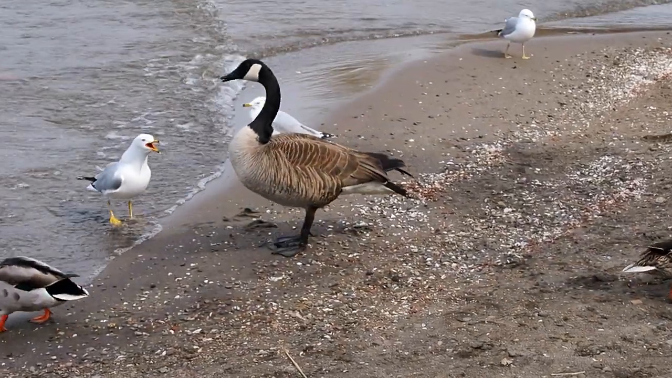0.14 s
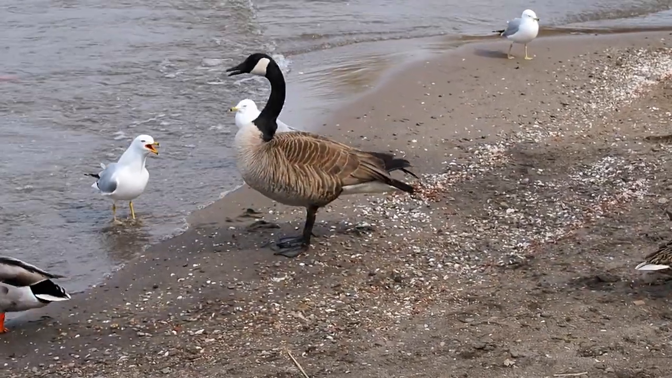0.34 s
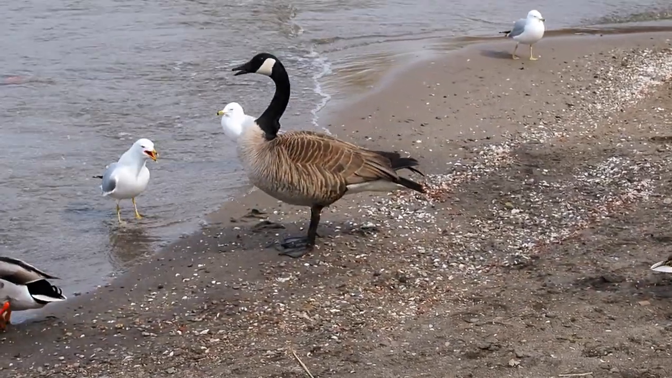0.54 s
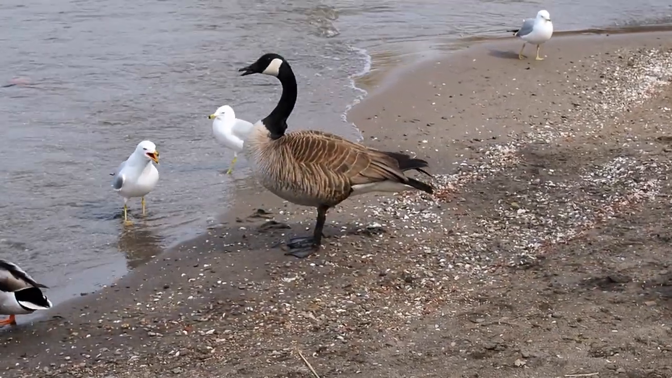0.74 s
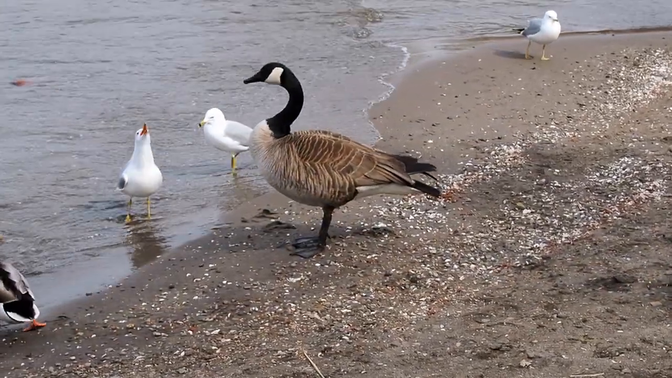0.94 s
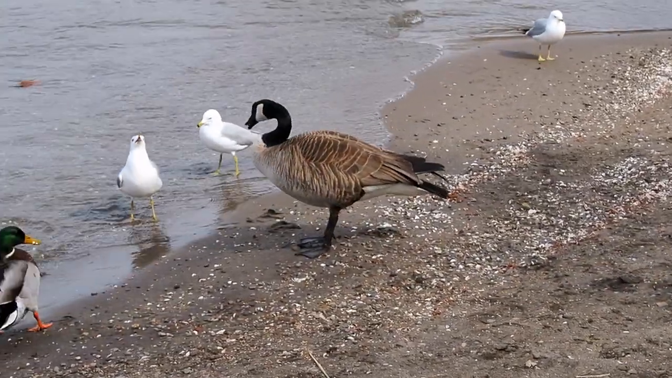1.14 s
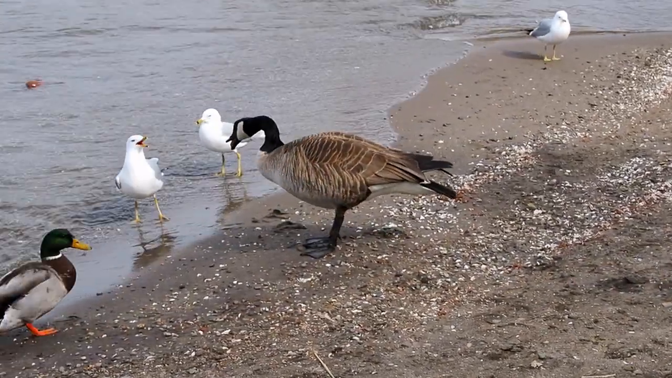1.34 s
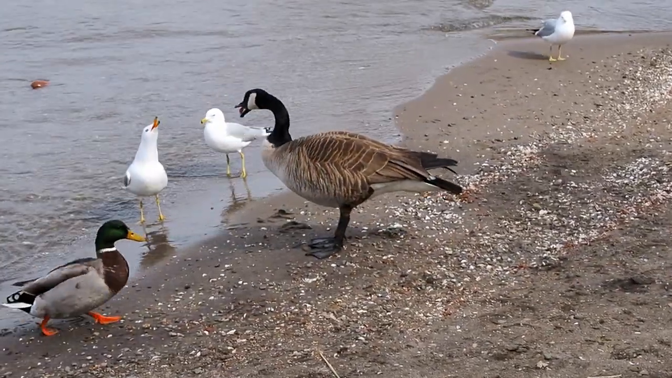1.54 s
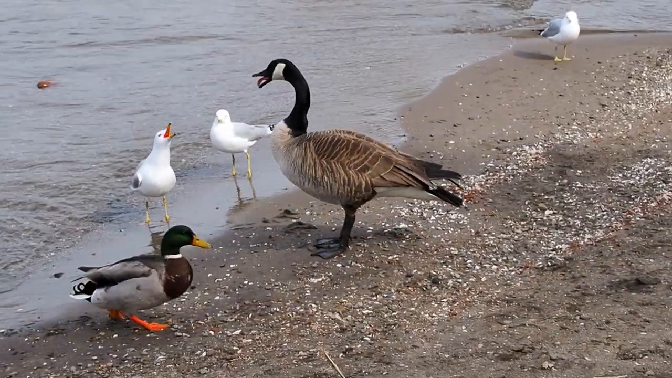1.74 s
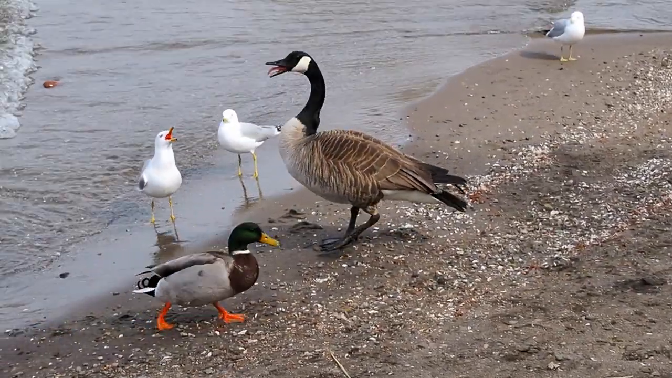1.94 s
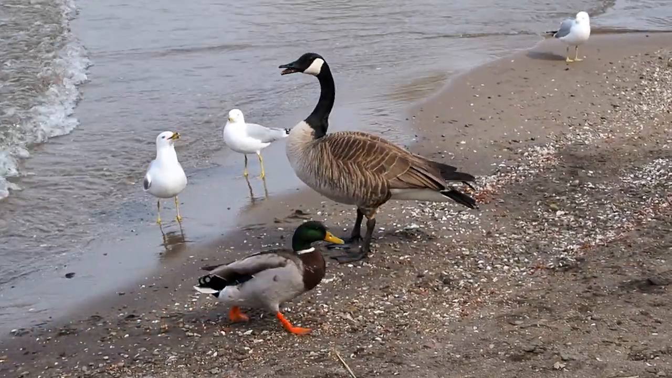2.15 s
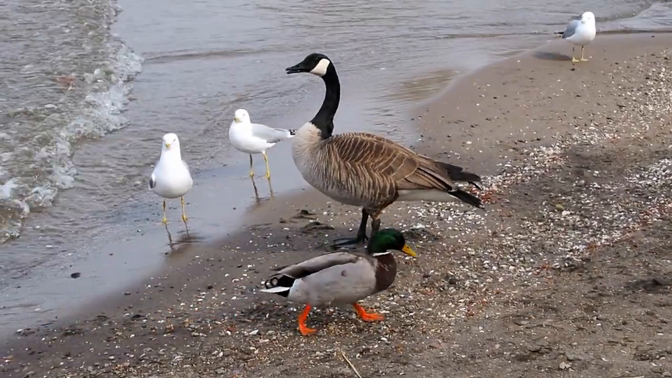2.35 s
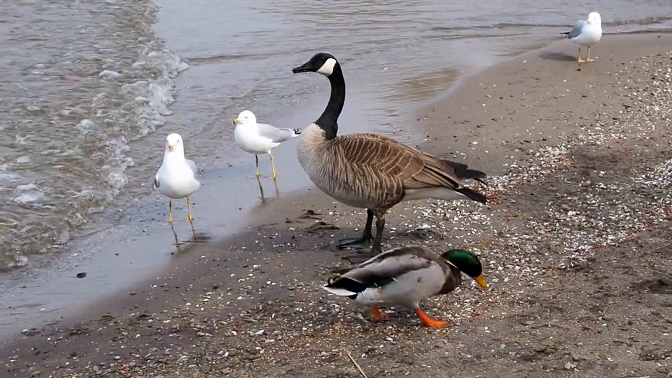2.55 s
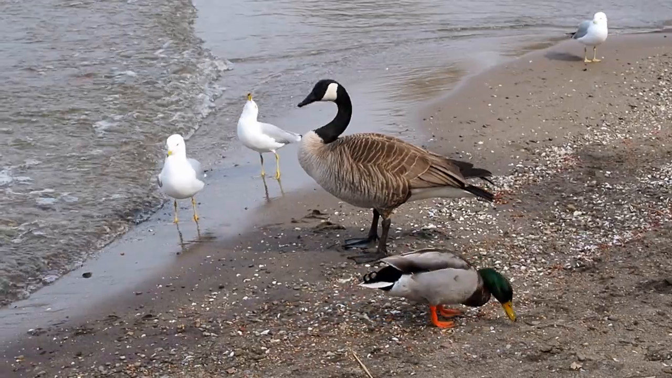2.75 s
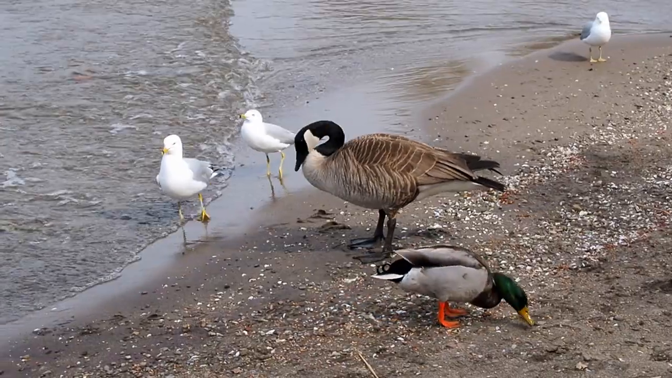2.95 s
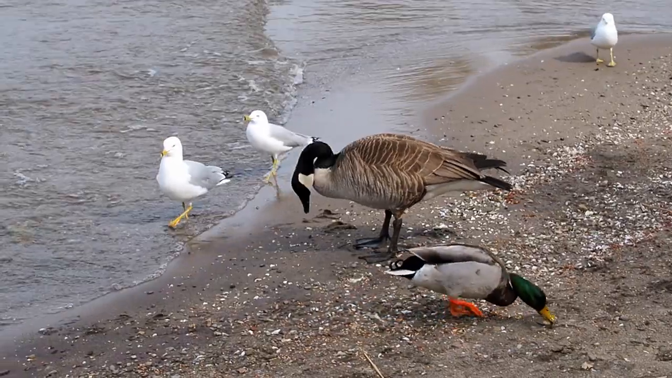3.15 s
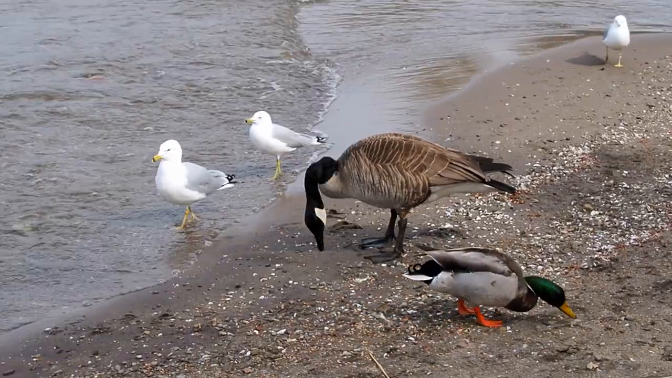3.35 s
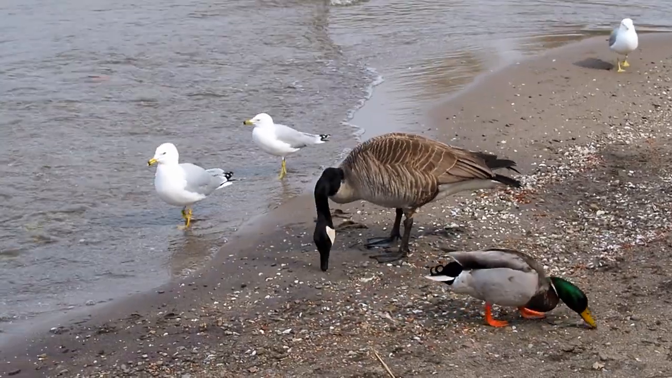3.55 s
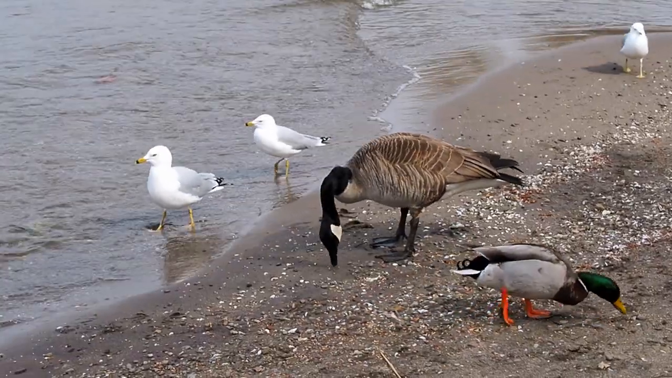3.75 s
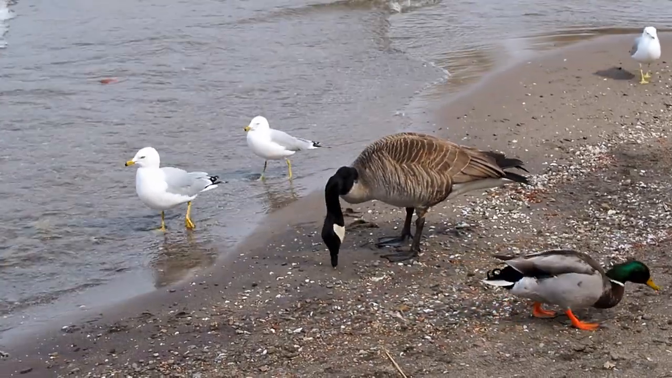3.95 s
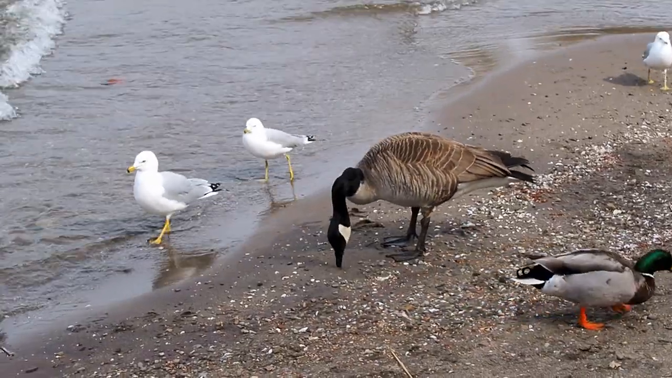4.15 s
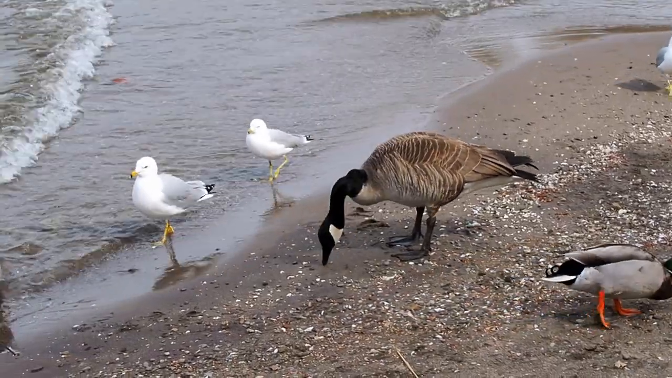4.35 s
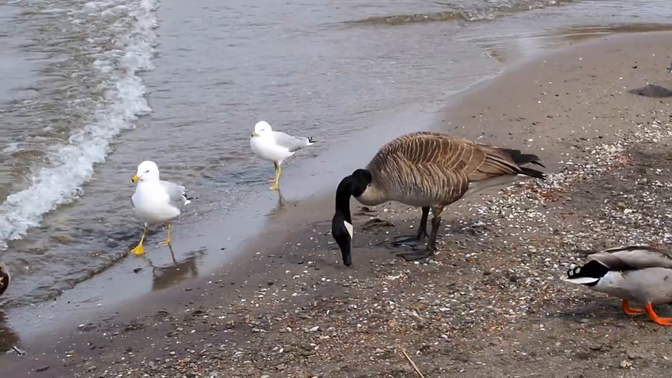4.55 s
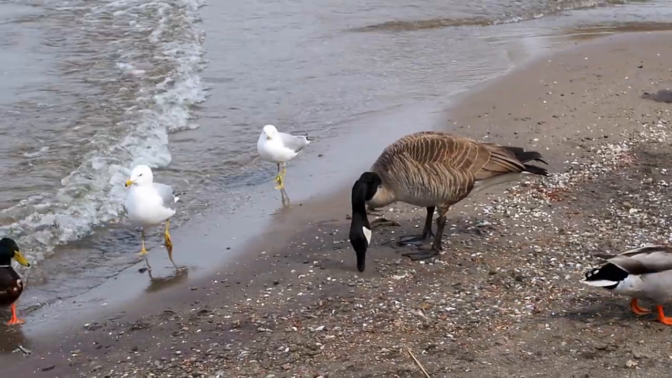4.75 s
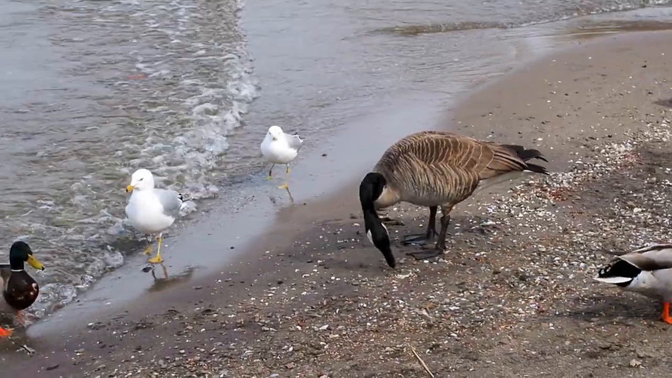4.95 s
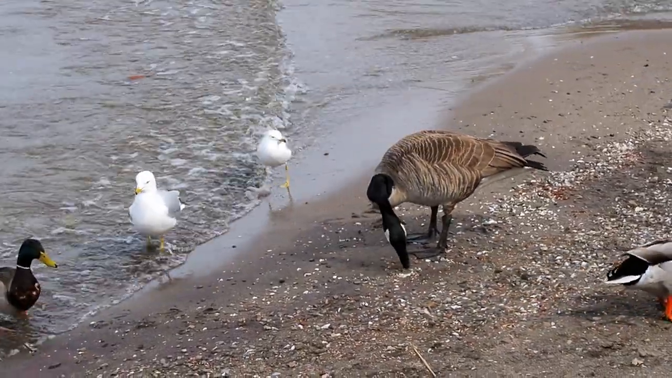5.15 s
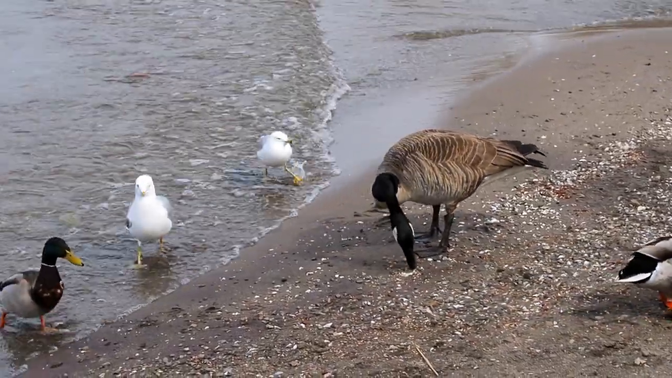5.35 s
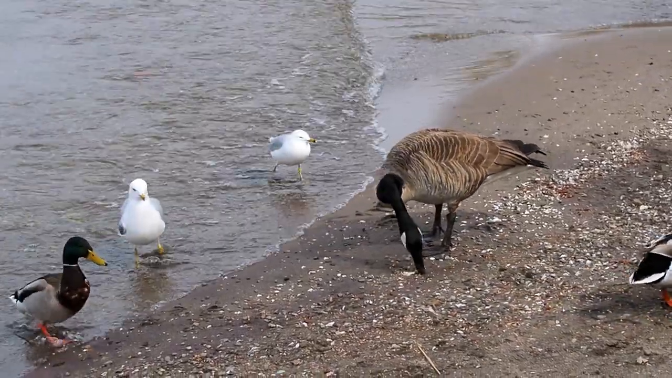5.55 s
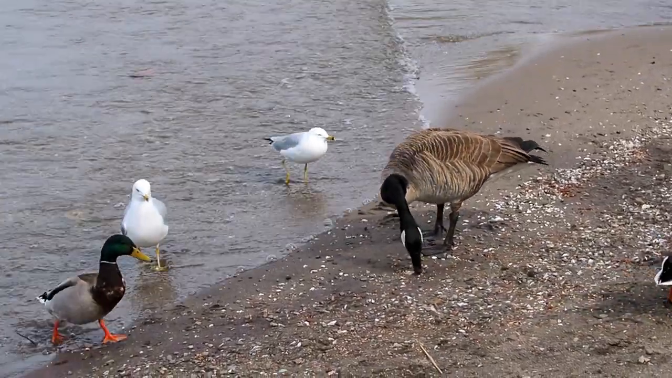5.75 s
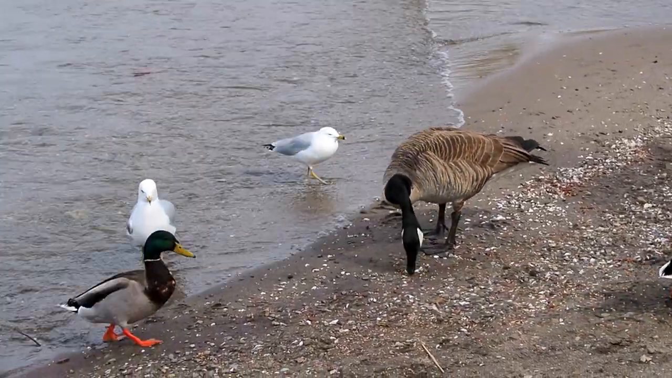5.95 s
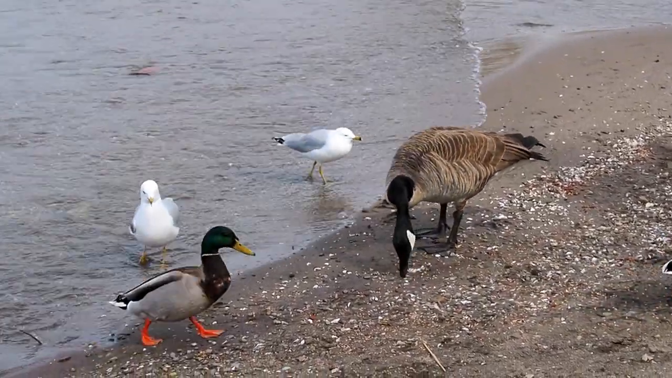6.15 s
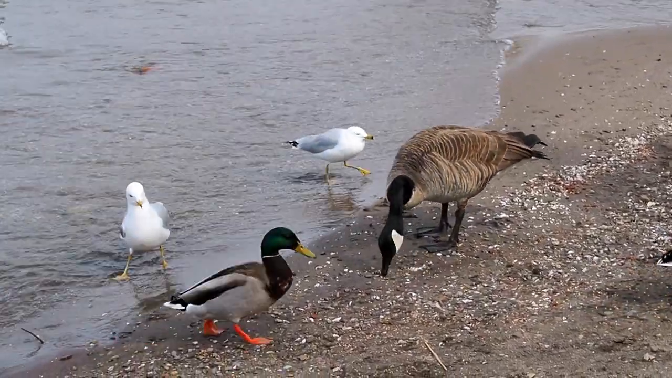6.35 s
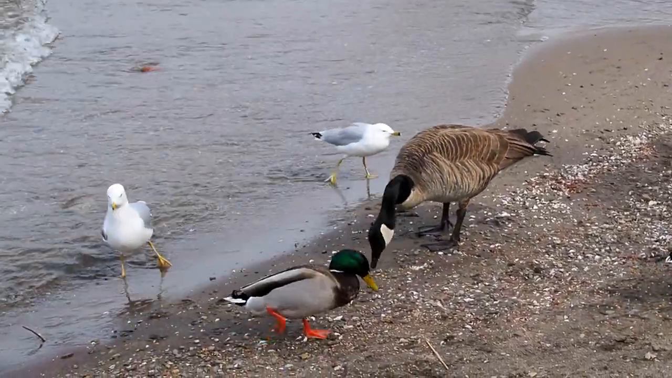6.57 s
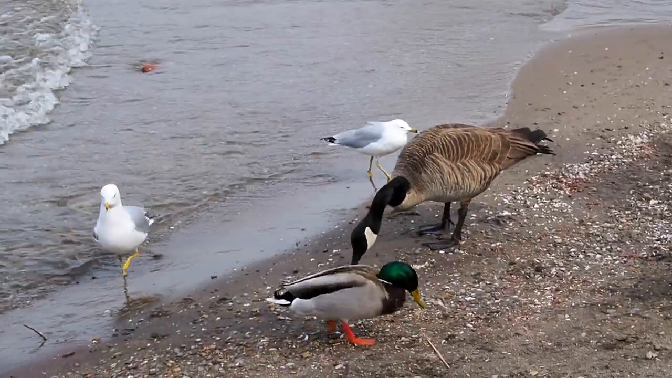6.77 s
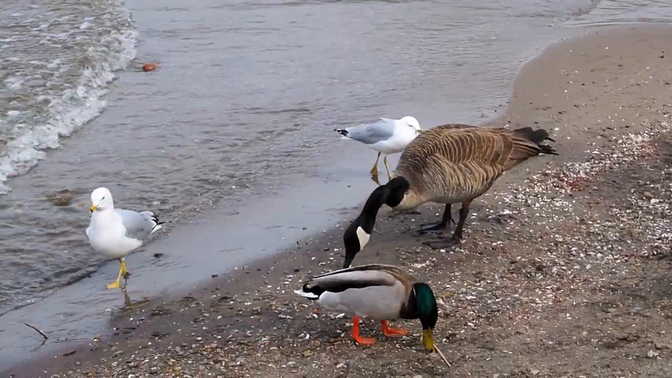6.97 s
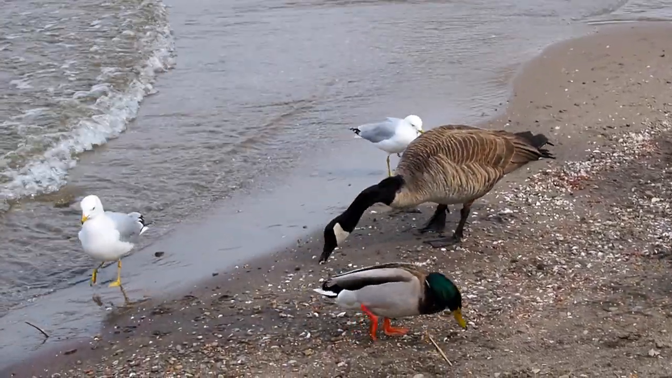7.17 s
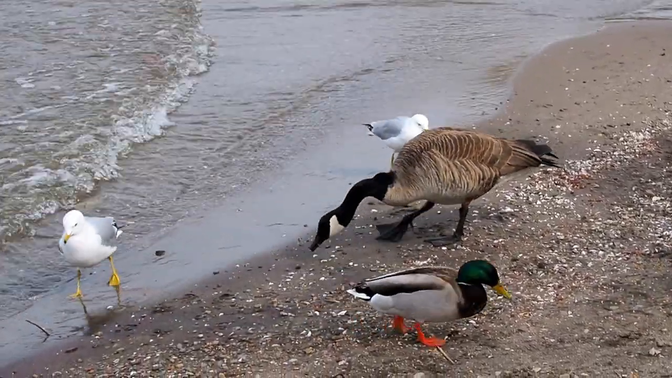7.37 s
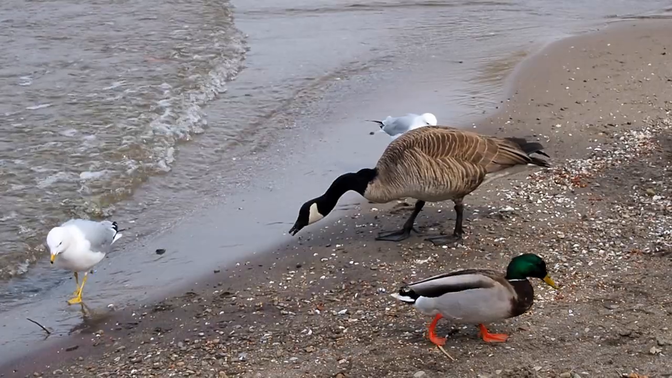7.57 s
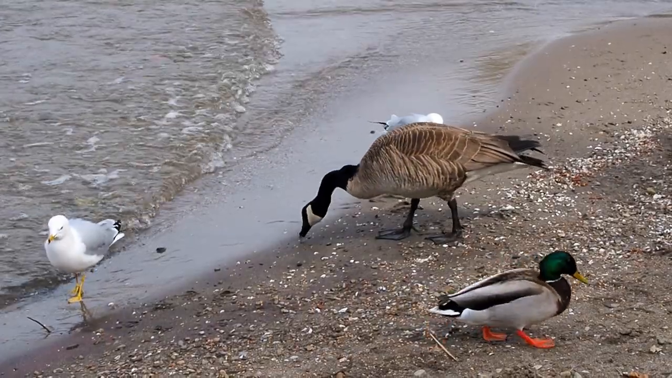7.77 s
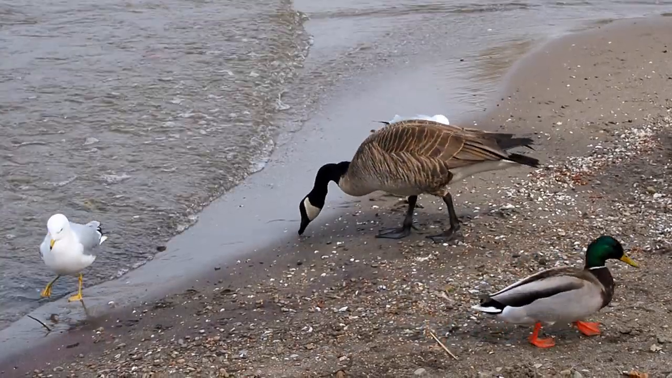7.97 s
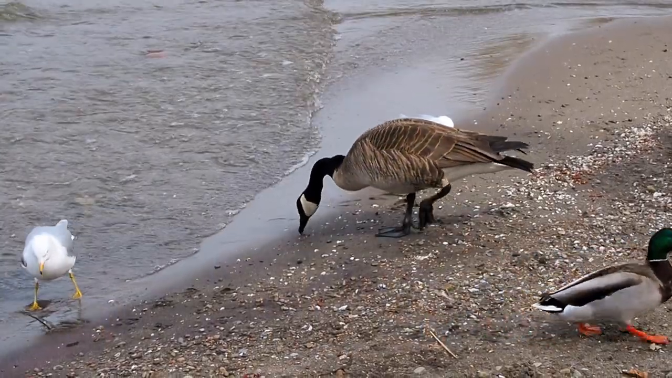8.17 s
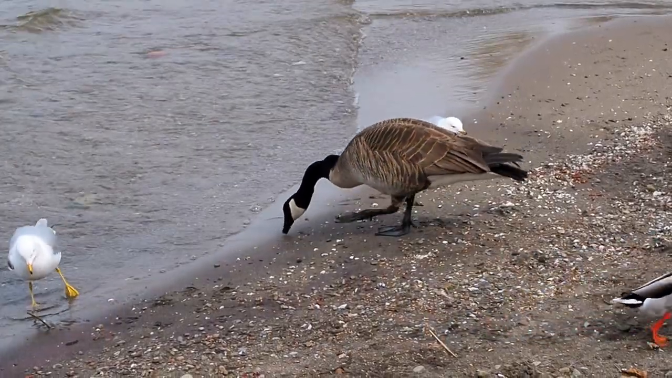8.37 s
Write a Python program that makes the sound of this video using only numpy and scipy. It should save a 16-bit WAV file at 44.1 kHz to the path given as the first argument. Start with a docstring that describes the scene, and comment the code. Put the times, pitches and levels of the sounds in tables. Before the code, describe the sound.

Close, loud gull calls open the scene, roughly two a second, nasal and cracking from low to high, followed by a thin descending squeal. Several calm seconds of light lapping follow, with bubbly wash, fine foam hiss, an occasional tiny click of shell grit and a drop plinking. Near the end two longer, somewhat softer gull cries sound slightly to the right. Open beach, dry stereo pickup, little bass.

```python
"""Gulls call on a lakeshore while small waves run up the sand and drain through shell grit.
Most calls start in a reedy low voice, made of pulses that ring the throat, break into a clear high
stack of harmonics and end in a short rasp; where the voices overlap, the low one puts sidebands on the high.
The water is coloured noise with ringing bubbles in it: slosh, wash and fizzing foam.
Shell ticks are short noise bursts, and single drops are dying sines that rise in pitch."""
import sys
import numpy as np
from scipy import signal
from scipy.fft import rfft, irfft, next_fast_len
from scipy.io import wavfile
from scipy.ndimage import uniform_filter1d, map_coordinates

SR = 44100
rng = np.random.default_rng(int(sys.argv[2]) if len(sys.argv) > 2 else 0)


def bounce(signal):
    """Save signal as a 16-bit WAV file at the path given by the first command-line argument."""
    frames = np.transpose(np.atleast_2d(signal))
    limited = np.clip(frames, -1, 1)
    pcm = np.round(limited * 32767).astype(np.int16)
    wavfile.write(sys.argv[1], SR, pcm)


N = 370881  # length in samples

# Throat colours of the low voice, for different settings of beak and neck.
# Each row: frequency in Hz, gain in dB.
OPEN = [(1150, -15.5), (1750, 5), (2700, -2.5), (3500, 3), (4800, 7.5), (5500, -15)]
WIDE = [(1850, -2), (2500, -1), (3600, 6.5), (4350, -8), (5000, 4), (5650, -1)]
BOWED = [(1280, -2), (1950, 5), (2550, -0.5), (3200, -17), (3900, -8.5), (5250, -10.5)]
HOARSE = [(1400, -6.5), (1800, 1), (2450, 4.5), (3400, -5), (4400, 2), (5400, -11.5)]
SQUEAK = [(1700, -14), (2570, 3.5), (3420, -4.5), (4280, -13), (5130, -11)]
YELP = [(1200, 11.5), (1450, -5.5), (1950, -14), (3000, -5.5), (4000, 4), (5500, -6)]


def amp(db):
    """Decibels to gain."""
    return 10 ** (np.asarray(db) / 20)


def unit(x):
    """Scale to rms 1."""
    return x / np.sqrt(np.mean(x ** 2) + 1e-20)


def along(points, hz):
    """Read (Hz, value) points on a log axis."""
    f, v = np.transpose(points)
    return np.interp(np.log(hz + 1), np.log(f + 1), v)


def curves(rows, t):
    """Each column after the time, read at times t."""
    s, *cols = np.transpose(rows)
    return [np.interp(t, s, c) for c in cols]


def wobble(rate, size):
    """A smooth random curve, rate knots a second."""
    knots = rng.standard_normal(int(size * rate / SR) + 4)
    return map_coordinates(knots, [np.arange(size) * rate / SR])


def filtered(x, response):
    """x times a response of frequency."""
    m = next_fast_len(N + SR // 2)
    return irfft(rfft(x, m) * response(np.fft.rfftfreq(m, 1 / SR)), m)[..., :N]


def cycle(hz):
    """Running phase of an oscillator."""
    return 2 * np.pi * np.cumsum(hz) / SR


def times(start, end):
    """Sample times of a note."""
    return np.arange(max(int(start * SR), 0), min(int(end * SR), N)) / SR


def edges(t, fade):
    """Soft-edged gate of a note and the time to its nearer end."""
    inside = np.minimum(t - t[0], t[-1] - t)
    return np.sin(np.pi / 2 * np.clip(inside / fade, 0, 1)), inside


def bell(t, centre, before, after):
    """A smooth hump of height 1 with its own width on each side."""
    return np.exp(-((t - centre) / np.where(t < centre, before, after)) ** 2)


def throat_gain(throat, hz):
    """What the throat lets through at these frequencies."""
    # Skirts that every throat shares. Each row: frequency in Hz, gain in dB.
    low_skirt = [(600, -33.5)]
    high_skirt = [(7200, -16.5), (10000, -22), (15000, -37)]
    return amp(along(low_skirt + throat + high_skirt, hz))


def reed(t, hz, db, throat, rough):
    """Low voice: pulses ring the throat, with uneven cycles as it starts and stops."""
    gate, inside = edges(t, fade=0.0085)
    rough = rough + 0.635 * np.exp(-(inside / 0.0092) ** 2)
    phase = cycle(hz * (1 + 0.088 * rough * wobble(495.0, len(t))))
    pulses = sum(np.sin(k * phase) for k in range(1, 23))
    pulses = pulses * (1 + .7 * rough * wobble(800, len(t)))
    size = 2 * len(t)
    spectrum = rfft(pulses, size) * throat_gain(throat, np.fft.rfftfreq(size, 1 / SR))
    voice = irfft(spectrum, size)[:len(t)]
    # dividing by the running rms lets the level curve alone shape the loudness
    strength = np.sqrt(np.abs(uniform_filter1d(voice ** 2, size=700)) + 1e-12)
    return t, voice / strength * gate * amp(db)


def low_note(throat, start, loudest, end, first_hz, last_hz, flick_hz, db, swell, rough):
    """The low voice swells and glides, and where a flick is set its pitch jumps up at the end."""
    flick_s, fade_db_per_s = 0.013, 192  # time constant of the flick; fall after the loudest moment
    t = times(start, end)
    hz = np.linspace(first_hz, last_hz, len(t)) + flick_hz * np.exp((t - end) / flick_s)
    level = db - np.where(t < loudest, swell, fade_db_per_s) * np.abs(t - loudest)
    return reed(t, hz, level, throat, rough)


def rasp(s, db, half):
    """A short swell of the low voice, so uneven that it loses its pitch."""
    t = times(s - half, s + half)
    level = db - 17 * np.abs(t - s) / half
    return reed(t, np.linspace(860, 790, len(t)), level, HOARSE, rough=.9)


def sidebands(beat, t, hz, phase):
    """Sum and difference tones of the two voices, shaped by the throat."""
    # The throat while both voices sound. Each row: frequency in Hz, gain in dB.
    two_voiced = [(1100, -39), (1400, -2.5), (2300, -6.5), (2600, -12), (3300, -10.5), (4200, 0),
                  (6100, -1.5)]
    start, end, first_hz, last_hz, db, fade = beat
    beat_hz = np.interp(t, [start, end], [first_hz, last_hz])
    gate = np.clip(np.minimum((t - start) / 0.012, (end - t) / 0.025), 0, 1)
    slow = cycle(beat_hz * (1 + 0.01 * wobble(480, len(t))))
    lines = 0
    for k in range(1, 6):  # harmonics of the high voice
        for j in (-2, -1, 1):  # multiples of the low pitch, below and above each harmonic
            gain = throat_gain(two_voiced, k * hz + j * beat_hz) / abs(j)
            lines = lines + gain * np.sin(k * phase + j * slow)
    return gate * amp(db - fade * (t - start)) * lines


def tone(t, hz, levels, upper_db, roll_db):
    """High voice: a clean stack of harmonics, unsteady as it catches and lets go."""
    # Base levels of harmonics four to eight in dB, set against the third.
    overtones = [0, -6, -11.5, -16, -31]
    # The low voice beating against the high one. Each row: start in seconds, end in seconds,
    # first pitch in Hz, last pitch in Hz, level in dB, fade in dB per second.
    beats = [(0.118, 0.198, 680, 680, -32, 140), (.598, .655, 700, 700, -32, 260),
             (1.11, 1.19, 620, 580, -43, 160), (1.629, 1.771, 515, 372, -34, -1)]
    shimmer_db = 0.7  # each harmonic wavers a little
    gate, inside = edges(t, fade=0.0014)
    unsteady = .001 + .025 * np.exp(-inside / .008)
    jitter = .0005 * wobble(60, len(t)) + unsteady * wobble(1200, len(t))
    phase = cycle(hz * (1 + jitter))
    upper = [levels[2] + upper_db + db - roll_db * k for k, db in enumerate(overtones)]
    voice = 0
    for k, db in enumerate(levels + upper, 1):
        voice = voice + amp(db + shimmer_db * wobble(35, len(t))) * np.sin(k * phase)
    for beat in beats:
        if t[0] < beat[1] and beat[0] < t[-1]:
            voice = voice + sidebands(beat, t, hz, phase)
    return t, np.sqrt(2) * voice * gate


def high_note(start, crest, end, crest_hz, width, scoop_hz, sag_hz, drop_hz, db, swell_db,
              second_db, third_db, brighten_db, upper_db, roll_db):
    """An arch of pitch that scoops, sags and drops; level and brightness shift, then it dulls."""
    swell_s = 0.075  # level and brightness settle over this time
    drop_s, release_s = 0.0154, 0.011  # time constants of pitch and level giving way at the end
    release_db, release_dull_db = 6, 17  # lost by the whole note, and further by the third harmonic
    t = times(start, end)
    arch = np.where(t < crest, scoop_hz, sag_hz) * (1 - bell(t, crest, width, width))
    hz = crest_hz - arch - drop_hz * np.exp((t - end) / drop_s)
    starting = bell(t, start, swell_s, swell_s)
    ending = np.exp((t - end) / release_s)
    level = db - swell_db * starting - release_db * ending
    dull = brighten_db * starting + release_dull_db * ending
    levels = [level, level + second_db - dull / 2, level + third_db - dull]
    return tone(t, hz, levels, upper_db, roll_db)


def squeal():
    """The high voice slides a long way down, thin and unsteady."""
    # Each row: time in seconds, pitch in Hz, levels of the first, second and third harmonic in dB.
    slide = [(2.802, 2340, -27, -38, -37), (2.847, 2230, -30, -54, -44), (2.881, 2310, -31, -44, -37),
             (2.945, 2117, -37, -45, -57), (2.972, 1810, -35, -41, -45), (3.01, 1684, -56, -33.5, -54),
             (3.06, 1347, -52, -45, -62)]
    t = times(slide[0][0], slide[-1][0])
    hz, *levels = curves(slide, t)
    smooth_hz = uniform_filter1d(hz, size=700, mode="nearest")
    return tone(t, smooth_hz, levels, upper_db=-13.5, roll_db=1)


def add(out, t, x):
    """Place a note where the caller stands."""
    # Each row: time in seconds, right minus left in dB, right ear lead in samples.
    places = [(0, 2, 0), (1.7, 1, .1), (2.8, 1, .5), (7.6, 4, 2)]
    right_db, lead = curves(places, t[0])
    right = map_coordinates(x, [np.arange(len(t)) + lead])
    pair = np.array([x, right]) * amp([[-right_db / 2], [right_db / 2]])
    out[:, round(t[0] * SR):][:, :len(t)] += pair


def gulls():
    """Both voices of every call; so small a throat radiates little bass."""
    # Low voice. Each row: throat, start, loudest moment and end in seconds, first and last pitch in Hz,
    # final upward flick in Hz, level in dB, swell in dB per second, roughness from 0 to 1.
    low_notes = [ (OPEN, 0, 0.11, .117, 562, 606, 150, -19.5, 71, 0.058),
                 (WIDE, .522, 0.58, .604, 614, 620, 87, -16, 245, 0.037),
                 (BOWED, 1.012, 1.066, 1.082, 634, 654, 36, -23.5, 78, .13),
                 (BOWED, 1.076, 1.1, 1.116, 584, 642, 0, -25.5, 180, .14),
                 (HOARSE, 1.502, 1.517, 1.544, 725, 700, 0, -20.5, 600, 0.37),
                 (BOWED, 1.755, 1.73, 1.805, 760, 585, 0, -18.5, 0, .18),
                 (SQUEAK, 2.736, 2.783, 2.799, 864, 842, 46, -23, 41, 0.09),
                 (BOWED, 7.15, 7.24, 7.265, 330, 595, 0, -40, 30, .12),
                 (YELP, 7.56, 7.655, 7.664, 495, 815, 25, -30.5, 74, 0.21),
                 (YELP, 8.3, 8.357, 8.386, 591, 810, 45, -23, 166, 0.18), ]
    # Rasps at the edges of the calls. Each row: middle in seconds, level in dB, half length in seconds.
    rasps = [(0.105, -26, 0.013), (0.354, -22, 0.025), (0.522, -24, 0.027), (0.851, -24.5, 0.031),
             (1.018, -30, 0.027), (1.217, -31, 0.027), (1.243, -30.5, 0.037), (1.493, -24, 0.022),
             (7.124, -41, 0.037), (7.653, -38, 0.015), (8.034, -32.5, 0.014), (8.082, -47, 0.045),
             (8.302, -34.5, 0.028), (8.368, -31, 0.012)]
    # High voice. Each row: start, crest and end in seconds, crest pitch in Hz, crest width in seconds,
    # scoop up to the crest, sag after it and final drop in Hz, level in dB, swell in dB,
    # second and third harmonic in dB over the first, brightening in dB,
    # upper overtones in dB over the third, their extra roll-off in dB per harmonic.
    high_notes = [ (0.11, 0.239, .353, 1859, 0.12, 77, 161, 77, -16.5, 1.5, -8.5, 2, 5.5, -17.5, 1.5),
                  (0.599, 0.68, .85, 1861, .061, 57, 53, 98, -20, 2, 1, 7.5, -0.5, -23, -1),
                  (1.106, 1.252, 1.252, 1720, .104, 134.5, 0, 0, -33.3, -1.5, -12, -10, -6.5, -2.5, 1),
                  (1.543, 1.692, 1.762, 1866, 0.088, 219.5, 44, 12, -19.5, 12.5, -22.5, -22, -22.5, -1.5, -1.5),
                  (7.649, 7.829, 8.032, 1901, .157, 152, 2, 249, -27.5, 3.5, -2.5, 5.5, 14.5, -8.5, 2.5),
                  (8.068, 8.08, 8.108, 2105, .05, 0, 22.5, 0, -41, 1.5, -15, -20, 0, -10, 0),
                  (8.374, 8.546, 8.75, 1877, 0.17, 151, 0, 246, -26.5, 4.5, -1, 2, 1.5, -7, 0), ]
    out = np.zeros((2, N))
    for sound, rows in ((low_note, low_notes), (rasp, rasps), (high_note, high_notes)):
        for row in rows:
            add(out, *sound(*row))
    add(out, *squeal())
    return filtered(out, lambda hz: 1 - 1 / (1 + (hz / 750) ** 4))


def shore(x, t60):
    """Sand and water scatter a faint, short tail: noise that dies by 60 dB in t60 seconds."""
    t = np.arange(SR // 2) / SR
    tail = rng.standard_normal((2, len(t))) * amp(-60 * t / t60) * (1 - np.exp(-t / .004))
    return signal.fftconvolve(x, tail / np.linalg.norm(tail[0]), axes=1)[:, :N]


def surge():
    """Gains of slosh, wash and fizz: each wave rises and drains over the calm water, and its foam follows."""
    # Wavelets running up the sand. Each row: crest in seconds, wash in dB, rise and drain in seconds.
    wavelets = [(1.75, -40, .72, .52), (3.98, -39, 0.74, 1.05), (6.6, -39.5, 0.51, .55)]
    # Patches of foam bursting on the sand. Each row: middle in seconds, fizz in dB, half length in seconds.
    foam = [(2.1, -43.5, 0.14), (3.3, -52, 0.25), (3.83, -43.5, 0.036), (5.155, -48, 0.3),
            (5.69, -45.5, 0.27), (7.055, -49.5, 0.18)]
    calm_slosh_db, calm_wash_db, calm_fizz_db = -46, -45.5, -48  # the water between the waves
    wave_slosh_db, wave_fizz_db = -11, -7  # slosh and fizz of a wave, against its wash
    foam_lag_s, foam_lasts = .1, 0.58  # fizz peaks after the wash; its drain, as a share of the wave's
    t = np.arange(N) / SR
    # powers add, and the root at the end makes gains of them
    waves = sum(amp(db) ** 2 * bell(t, s, rise, drain) for s, db, rise, drain in wavelets)
    froth = sum(amp(db + wave_fizz_db) ** 2 * bell(t, s + foam_lag_s, rise, foam_lasts * drain)
                for s, db, rise, drain in wavelets)
    patches = sum(amp(db) ** 2 * bell(t, s, half, half) for s, db, half in foam)
    return np.sqrt([amp(calm_slosh_db) ** 2 + amp(wave_slosh_db) ** 2 * waves,
                    amp(calm_wash_db) ** 2 + waves,
                    amp(calm_fizz_db) ** 2 + froth + patches])


def bubbles(rate, centre_hz, cycles, spread_db):
    """Small bubbles, rate a second, ring briefly and rise in pitch, each at its own place."""
    count = int(rate * N / SR)
    when, place = rng.random((count, 2)).T
    hz = np.clip(centre_hz * np.exp(.5 * rng.standard_normal((count, 1))), 500, 14000)
    size = amp(spread_db * np.minimum(rng.exponential(size=(count, 1)), 3))
    i = np.arange(400)  # samples in one ring
    age = hz * i / SR / cycles  # in decay times, each lasting this many cycles
    decay = np.exp(-age) * (1 - i / len(i))
    ring = size * decay * np.sin(2 * np.pi * cycles * age * (1 + 0.055 * np.minimum(age, 2)))
    at = ((when * N).astype(int)[:, None] + i).ravel()
    sides = [np.bincount(at, (ring * g[:, None]).ravel(), N)[:N] for g in (.5 + place, 1.5 - place)]
    return unit(np.array(sides))


def rush(spectrum, side_db, patchy_db, grains, lead):
    """Patchy stereo water noise with grains in it, coloured, rms 1; the left ear leads by some samples."""
    z = signal.stft(rng.standard_normal((2, N)), nperseg=512)[2]
    field = rng.standard_normal(z.shape[1:])
    field = uniform_filter1d(field, size=5, axis=0)  # patches spread over frequency
    field = uniform_filter1d(field, size=9, axis=1)  # and over time
    mid, side = signal.istft(z * amp(patchy_db * unit(field)), nperseg=512)[1][:, :N]
    ears = np.array([[1], [-1]])
    pair = unit(mid) + ears * amp(side_db) * unit(side) + grains
    pair = filtered(pair, lambda hz: amp(along(spectrum, hz)) * np.exp(1j * np.pi * ears * hz * lead / SR))
    return pair / np.sqrt(np.mean(pair.mean(0) ** 2))


def water():
    """Wavelets slightly to the left slosh, wash up the sand and leave fizzing foam."""
    # Colours of the three layers. Each row: frequency in Hz, relative gain in dB.
    slosh_colour = [(120, -65), (300, -45), (450, -27.5), (620, -19.5), (880, 1.5), (1400, 1.5),
                    (2000, -1.5), (9000, -59.5)]
    wash_colour = [(400, -74), (900, -24), (1800, -0.5), (2700, 2.5), (4200, 1.5), (5800, -2), (7200, -20),
                   (12000, -43)]
    fizz_colour = [(1500, -43), (5000, 5.5), (9300, 2.5), (12000, -1), (14500, -7), (15700, -27.5)]
    left_db = 0.4  # left ear over right
    slosh_gain, wash_gain, fizz_gain = surge()
    lap = wobble(12, N)
    gurgle = amp(-18) * bubbles(150, centre_hz=1294, cycles=4.2, spread_db=2.5)
    patter = amp(-8) * bubbles(600, centre_hz=2896, cycles=12.4, spread_db=3)
    crackle = amp(-5.5) * bubbles(700, centre_hz=8000, cycles=3.5, spread_db=6.5)
    slosh = rush(slosh_colour, side_db=-21.5, patchy_db=1.5, grains=gurgle, lead=4.1)
    wash = rush(wash_colour, side_db=2.0, patchy_db=2.2, grains=patter, lead=2.1)
    fizz = rush(fizz_colour, side_db=1, patchy_db=1.5, grains=crackle, lead=0)
    slosh = slosh * slosh_gain * amp(.5 * lap)
    wash = wash * wash_gain * amp(0.25 * lap)
    fizz = fizz * fizz_gain * amp(0.78 * wobble(24, N))
    return (slosh + wash + fizz) * amp([[left_db / 2], [-left_db / 2]])


def shells():
    """Bits of shell tick against each other: bright noise bursts that die within hundredths of a second."""
    # Each row: start in seconds, level in dB (before the offset and the colour below).
    ticks = [(0.404, -32), (3.2074, -27), (4.38, -30), (5.736, -27), (7.429, -30)]
    out, t = np.zeros((2, N)), np.arange(SR // 20) / SR
    for s, db in ticks:
        burst = amp(db - 7 - 60 * t / 0.016) * rng.standard_normal((2, len(t)))
        out[:, int(s * SR):][:, :len(t)] += burst
    colour = [(400, -60), (2500, 4), (5000, 16), (14000, -2.5)]  # Hz, dB
    return filtered(out, lambda hz: amp(along(colour, hz)))


def drips():
    """Single drops plink into the shallows, rising in pitch; they are too small to move much bass."""
    # Each row: start in seconds, level in dB (before swell and bass cut), starting pitch in Hz.
    plinks = [(3.6587, -22, 3010), (5.0414, -29, 1440), (5.247, -28, 4330)]
    out, t = np.zeros(N), np.arange(SR // 20) / SR
    swell = 1 - np.exp(-t / .0005)
    for s, db, hz in plinks:
        plink = amp(db - 60 * t / 0.018) * swell * np.sin(cycle(hz * (1 + 2 * t)))
        out[int(s * SR):][:len(t)] += plink
    return filtered(out, lambda hz: 1 - 1 / (1 + (hz / 1000) ** 6))


def scene():
    """Gulls in the open, over the water."""
    calls = gulls()
    return calls + amp(-18.5) * shore(calls, t60=0.3) + water() + shells() + drips()


def record(dry):
    """The microphone has two narrow dips in the treble and a band limit."""
    # Each row: centre in Hz, width in Hz, depth in dB.
    notches = [(6576, 295, -9.5), (10380, 684, -11)]
    top_hz = 15700

    def response(hz):
        """Gain of the dips, and nothing from the band limit up."""
        dips = sum(db * np.exp(-((hz - centre) / width) ** 2) for centre, width, db in notches)
        return amp(dips) * (hz < top_hz)

    return filtered(dry, response)


dry = scene()
out = record(dry)
bounce(out)
```